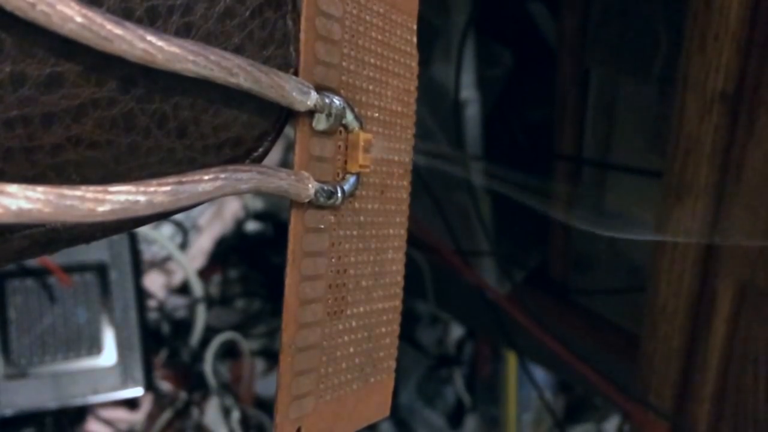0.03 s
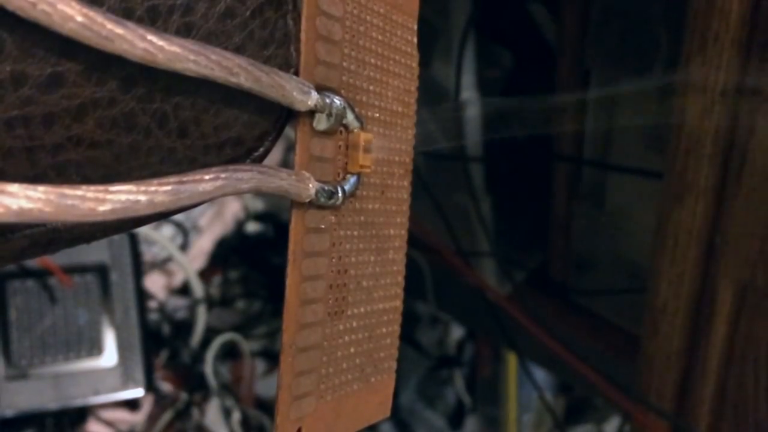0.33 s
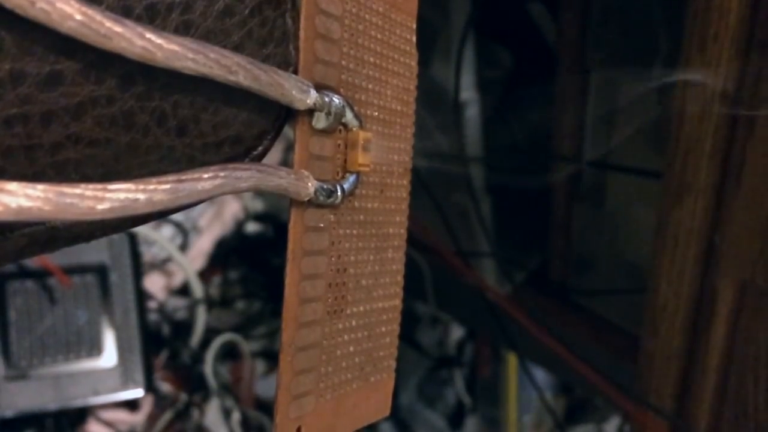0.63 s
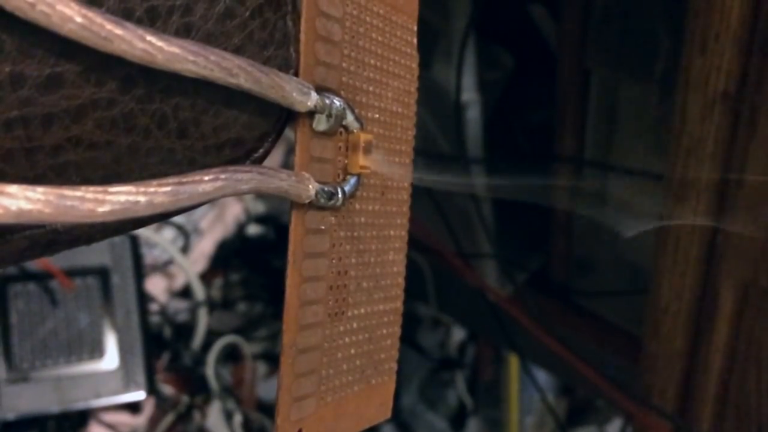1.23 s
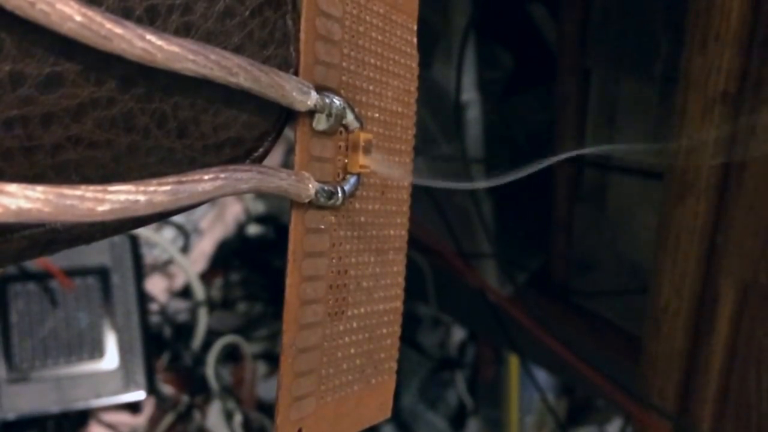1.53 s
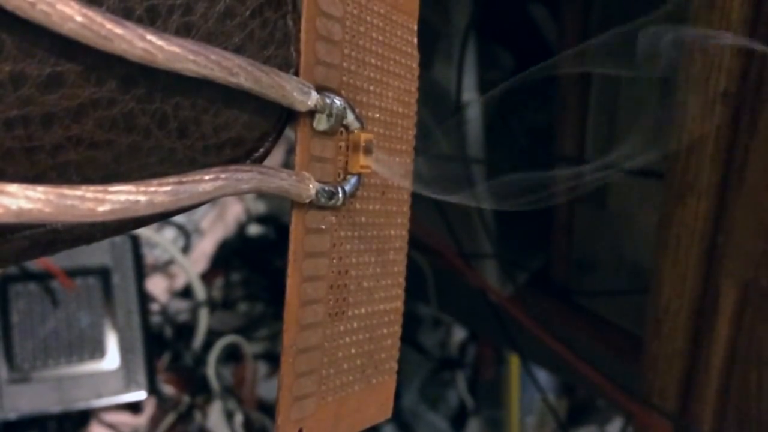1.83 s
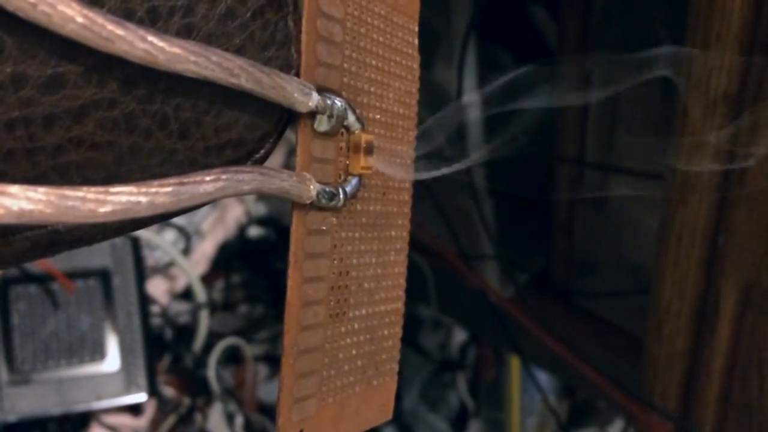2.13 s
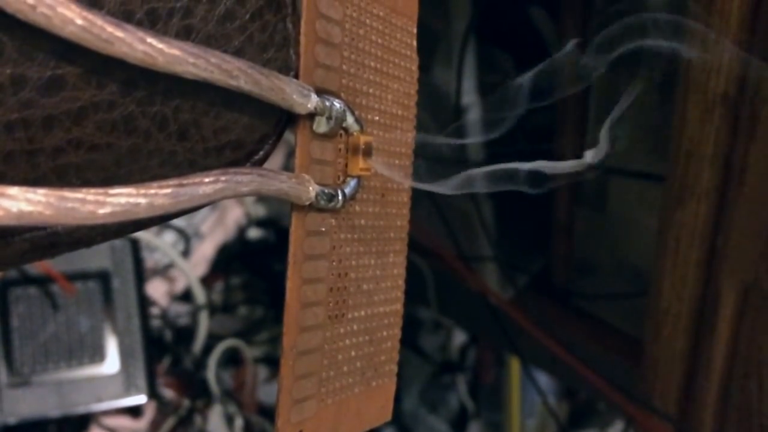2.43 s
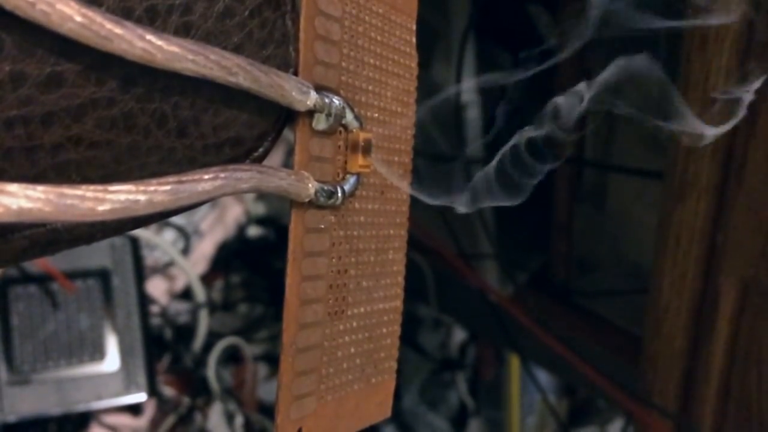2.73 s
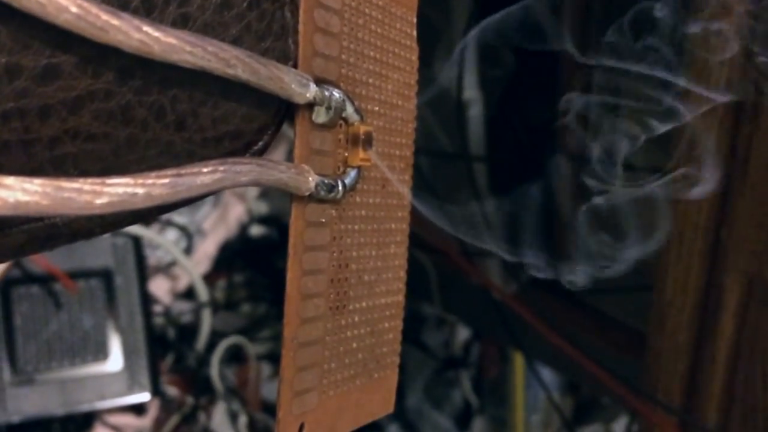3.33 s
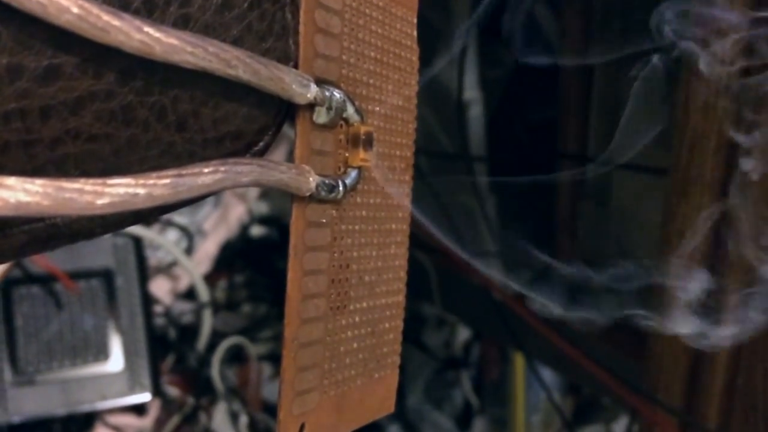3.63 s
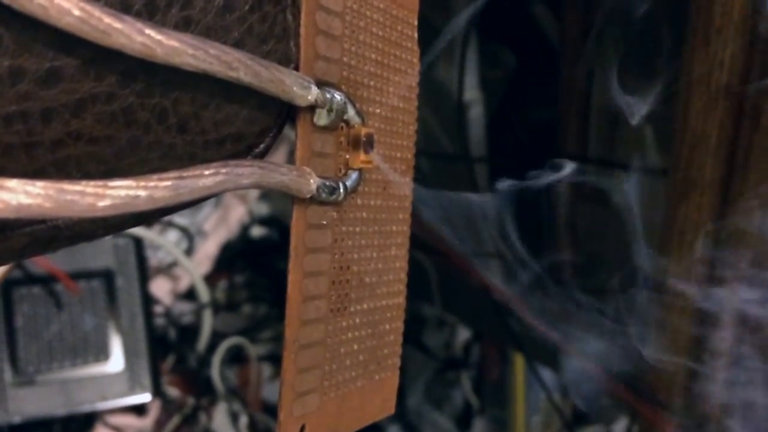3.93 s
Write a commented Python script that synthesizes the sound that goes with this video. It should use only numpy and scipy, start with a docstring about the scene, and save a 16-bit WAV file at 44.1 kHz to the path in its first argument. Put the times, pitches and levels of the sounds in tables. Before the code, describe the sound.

A sharp pop from a failing electronic part, heard up close on a workbench. Steady fan hum and hiss with faint ticks come first; the pop briefly pushes the hum down, and two smaller, slightly buzzy snaps follow.

```python
"""Capacitor failing on a bench.

Fan-cooled equipment hums and hisses. A small overheating capacitor ticks faintly, cracks with one
sharp pop, then snaps twice more. A mains-hum comb filter repeats each snap as a short buzz;
a compressor ducks the background, which slowly swells back."""
import sys
import numpy as np
from scipy import signal
from scipy.fft import rfft, irfft
from scipy.io import wavfile
from scipy.ndimage import uniform_filter1d, minimum_filter1d

SR = 44100
rng = np.random.default_rng(int(sys.argv[2]) if len(sys.argv) > 2 else 0)


def master_out(mix):
    """Clip the mix to full scale and print it as 16-bit PCM to the path in sys.argv[1]."""
    frames = np.transpose(np.atleast_2d(mix))
    ceiling = np.clip(frames, -1, 1)
    pcm = np.round(ceiling * 32767).astype(np.int16)
    wavfile.write(sys.argv[1], SR, pcm)


N = 4 * SR

# air noise spectrum: f/Hz, relative level/dB
AIR_SPECTRUM = [(20, -21), (32, -19), (47, -2.5), (65, -4), (90, -2), (115, -2), (150, -3.5), (200, -2),
                (280, -8), (340, -9), (430, -12), (560, -18.5), (800, -17), (1100, -20), (1600, -25),
                (2100, -24.5), (2600, -29.5), (3150, -26), (3800, -35), (5000, -35.5), (9000, -39),
                (15000, -42.5)]
# fan and housing resonances: f/Hz, width/Hz, level/dB
HOUSING_MODES = [(148, 17, -49), (219.4, 25, -45), (287.2, 12.6, -49.5), (386.7, 17, -59.5),
                 (451.3, 7.5, -58.5), (792, 33, -59.5), (2121, 31, -63.5), (3046, 27, -67.5),
                 (3160, 46, -66.5), (2990, 200, -67)]
# fan tones: f/Hz, level/dB
FAN_TONES = [(800.5, -56.5), (1066.5, -61), (1400, -68)]
# throbs and sags of the hum: t/s, gain/dB
HUM_THROBS = [(.25, -16), (.36, 9.5), (.47, -11), (.59, -9), (.64, 8), (.87, -0.5), (1.01, -13),
              (1.39, -12), (1.51, -7), (1.57, 5.5), (1.67, -18), (1.8, 11.5), (1.85, -8), (2.12, 0),
              (2.26, 9), (2.42, -24), (2.56, 8), (3.36, 6), (3.43, -9)]
# opening lift of the background: f/Hz, gain/dB
OPENING_LIFT = [(100, 4.5), (1000, 4.5), (2200, 7), (6000, 7), (14000, 8.5)]
# swells and dips of the rumble: t/s, half-width/s, gain/dB
RUMBLE_SWELLS = [(0.04, 0.019, -10), (0.145, 0.042, 1.5), (2.806, 0.03, -3), (2.956, 0.039, -3.5),
                 (3.084, 0.044, -1), (3.282, .025, -1.5), (3.355, 0.017, 4.5), (3.42, 0.036, -5.5),
                 (3.537, .018, 2.5), (3.743, 0.039, 0)]
# capacitor cracks: t/s, peak level/dB, body ring/ratio to the impulse
CAPACITOR_CRACKS = [(0.17, -28, .03), (0.7775, -37, 0.1), (1.2600, -38, 0.1), (1.3110, -40, .01),
                    (1.9675, -37, .01), (2.7568, -29, .03), (2.7662, -23, 0.5), (2.7685, 6, 0),
                    (3.1787, -10, 0.02), (3.3725, -8, 0)]
# crack spectrum: f/Hz, relative level/dB
CRACK_SPECTRUM = [(200, -30), (1500, -26), (3000, -12), (4500, -9.5), (6300, -5.5), (8600, -2.5),
                  (9600, -3.5), (10600, -1), (13000, 1), (14000, -7), (15200, -16), (16500, -22)]

TIME_S = np.arange(N) / SR
BIN_HZ = np.maximum(np.arange(N // 2 + 1) * SR / N, 1)


def undb(db):
    """Decibels to gain."""
    return 10 ** (np.asarray(db) / 20)


def at_rms(x, db):
    """Scale to an rms level."""
    return x * undb(db) / np.sqrt(np.mean(x ** 2))


def bin_gain(spectrum):
    """Gain per bin from (f/Hz, level/dB) points."""
    hz, db = np.array(spectrum).T
    return undb(np.interp(np.log(BIN_HZ), np.log(hz), db))


def filtered(x, gain):
    """Zero-phase filter, gain per bin."""
    return irfft(rfft(x) * gain, N)


def noise(gain, top_hz=15400):
    """Band-limited noise, gain per bin."""
    return filtered(rng.standard_normal(N), gain * (BIN_HZ < top_hz))


def drift(rate_hz):
    """Slow random motion, unit rms."""
    return at_rms(noise(np.exp(-(BIN_HZ / rate_hz) ** 2)), 0)


def fan_air():
    """Rushing air plus the noise-driven resonances of fans and housing."""
    out = at_rms(noise(bin_gain(AIR_SPECTRUM)), db=-39)
    for hz, width_hz, db in HOUSING_MODES:
        resonance = 1 / (1 + 2 * ((BIN_HZ - hz) / width_hz) ** 2)
        out += at_rms(noise(resonance), db)
    return out


def fan_hum(hz=223.8, wander=.028, flutter_db=2, throb_half_s=.028):
    """Main fan's low tone: wavers in pitch, flutters, throbs unevenly."""
    clock_s = np.cumsum(1 + wander * drift(rate_hz=8.77)) / SR
    throb_db = sum(db * np.exp(-((TIME_S - at_s) / throb_half_s) ** 2) for at_s, db in HUM_THROBS)
    envelope = undb(throb_db + flutter_db * drift(rate_hz=20))
    return at_rms(np.sin(2 * np.pi * hz * clock_s) * envelope, db=-44.5)


def fan_whine(wander=.00348, flutter_db=3):
    """Higher fan tones: waver together in pitch, flutter separately."""
    clock_s = np.cumsum(1 + wander * drift(rate_hz=5.67)) / SR
    out = np.zeros(N)
    for hz, db in FAN_TONES:
        flutter = undb(-flutter_db * drift(rate_hz=16))
        out += at_rms(np.sin(2 * np.pi * hz * clock_s) * flutter, db)
    return out


def equipment(lift_end_s=.169, lift_fade_s=.0053, rumble_top_hz=704):
    """All fans: louder and brighter at first; the rumble swells and dips briefly."""
    fans = fan_air() + fan_hum() + fan_whine()
    opening = np.clip((lift_end_s - TIME_S) / lift_fade_s + .5, 0, 1)
    lifted = filtered(fans, bin_gain(OPENING_LIFT))
    rumble = filtered(fans, 1 / (1 + (BIN_HZ / rumble_top_hz) ** 2))
    swell_db = sum(db * np.exp(-((TIME_S - at_s) / half_s) ** 2) for at_s, half_s, db in RUMBLE_SWELLS)
    return (1 - opening) * fans + opening * lifted + (undb(swell_db) - 1) * rumble


def tail(decay_s, energy_db):
    """Decaying noise, energy relative to a unit impulse."""
    x = rng.standard_normal(N) * np.exp(-TIME_S / decay_s)
    return x * undb(energy_db) / np.sqrt(np.sum(x ** 2))


def capacitor(ring_hz=12900, ring_decay_s=.0002, bounce_s=.00065, bounce_db=-18):
    """Cracks: bright impulse, tiny body ring, bounce off the circuit board, bench scatter, room wash."""
    body = np.cos(2 * np.pi * ring_hz * TIME_S) * np.exp(-TIME_S / ring_decay_s)
    out = np.zeros(N)
    for at_s, db, ring in CAPACITOR_CRACKS:
        bench = tail(decay_s=.0025, energy_db=-19)
        room = tail(decay_s=.016, energy_db=-23.5)
        hit = bench + room
        hit[0] = 1  # direct impulse
        hit[int(bounce_s * SR)] += undb(bounce_db)
        crack = (hit + ring * body) / (1 + ring)
        start = int(at_s * SR)
        out[start:] += undb(db) * crack[:N - start]
    colour = bin_gain(CRACK_SPECTRUM)
    impulse_peak = irfft(colour, N)[0]
    return filtered(out, colour) / impulse_peak


def mains_comb(x, mains_hz=60, feedback=.585):
    """Notches at all mains harmonics; a click returns once per cycle, fading."""
    padded_hz = np.arange(N + 1) * SR / (2 * N)
    delay = np.exp(-2j * np.pi * padded_hz / mains_hz)
    comb = (1 - delay) / (1 - feedback * delay)
    return irfft(rfft(x, 2 * N) * comb)[:N]


def compressor(x, threshold_db=-20, ratio=4.44, sense_hz=2500,
               lookahead_s=.0019, hold_s=.12, release_s=.26):
    """Treble peaks pull the gain down at once; the cut holds, then dies away."""
    treble_envelope = np.abs(signal.hilbert(filtered(x, BIN_HZ > sense_hz)))
    over_db = 20 * np.log10(np.maximum(treble_envelope / undb(threshold_db), 1))
    target_db = over_db * (1 / ratio - 1)
    half_hold, half_ahead = int(hold_s * SR / 2), int(lookahead_s * SR / 2)
    held_db = minimum_filter1d(target_db, 2 * half_hold + 1, origin=half_hold)
    release = np.exp(-TIME_S / release_s)
    gain = undb(np.minimum.accumulate(held_db / release) * release)
    return x * uniform_filter1d(gain, 2 * half_ahead + 1, origin=-half_ahead)


def scene():
    """Equipment behind, capacitor close; mono."""
    return (equipment() + capacitor())[None]


def record(dry):
    """Mains comb, compressor, steep low-pass."""
    top_hz = 16500
    lowpass = signal.ellip(10, .1, 80, top_hz, fs=SR, output="sos")
    ducked = compressor(mains_comb(dry[0]))
    return signal.sosfilt(lowpass, ducked)[None]


dry = scene()
out = record(dry)
master_out(out)
```